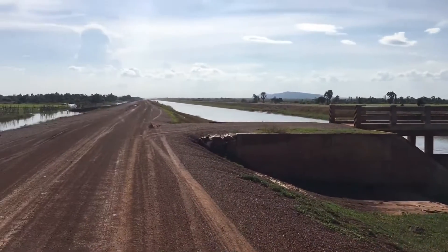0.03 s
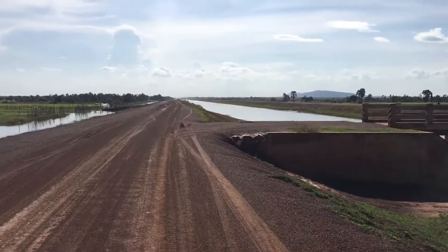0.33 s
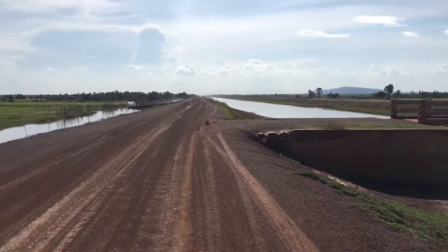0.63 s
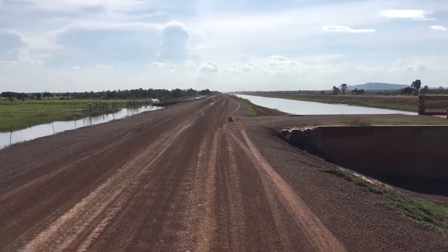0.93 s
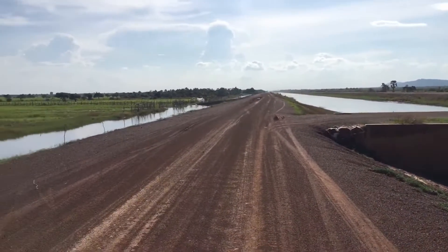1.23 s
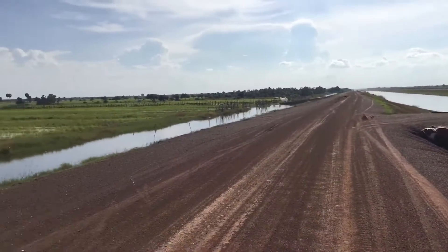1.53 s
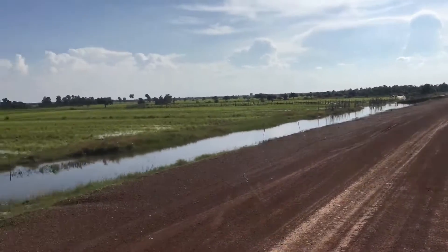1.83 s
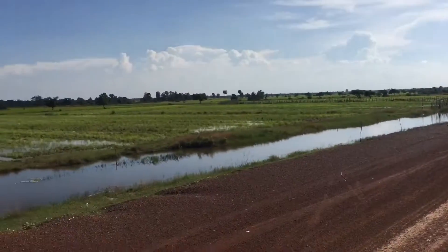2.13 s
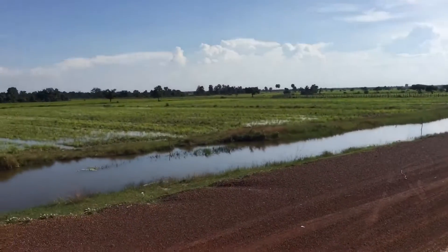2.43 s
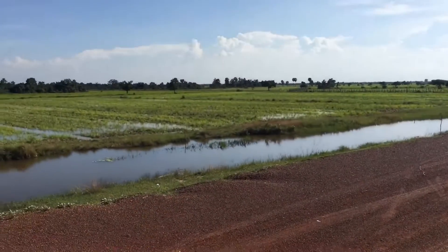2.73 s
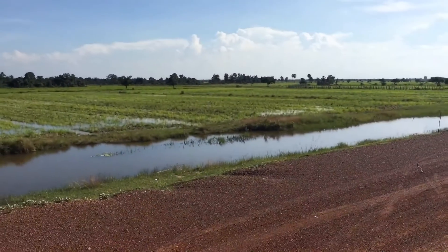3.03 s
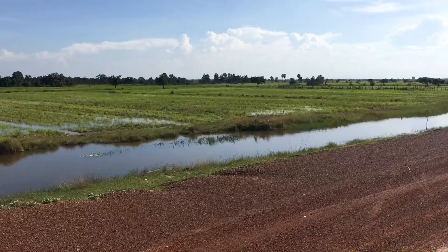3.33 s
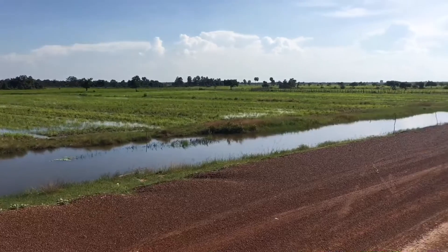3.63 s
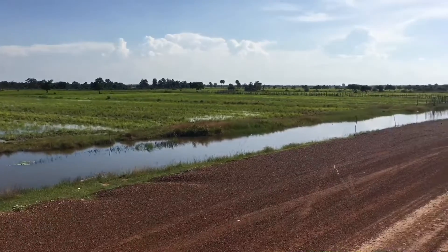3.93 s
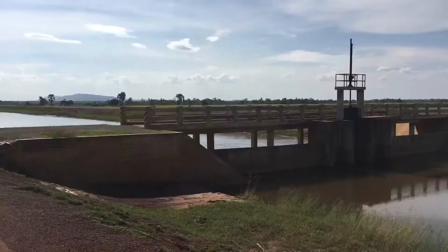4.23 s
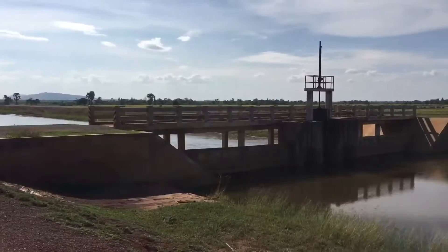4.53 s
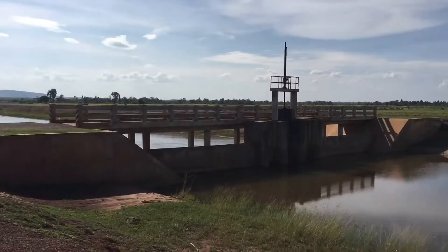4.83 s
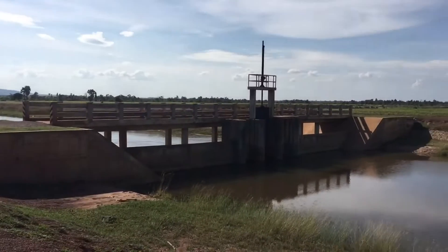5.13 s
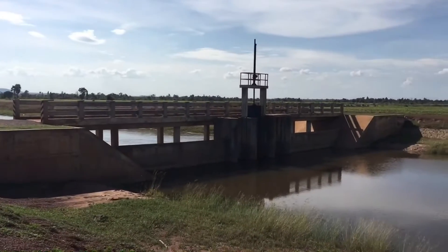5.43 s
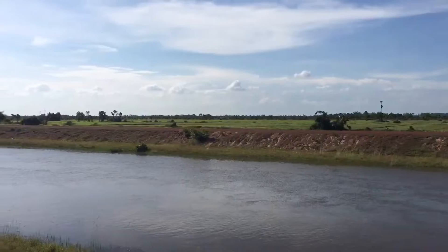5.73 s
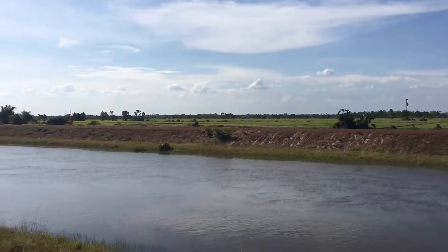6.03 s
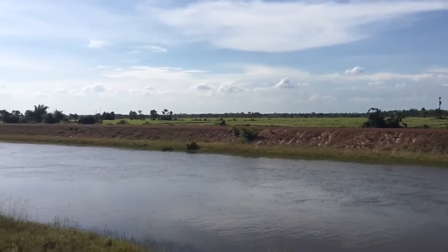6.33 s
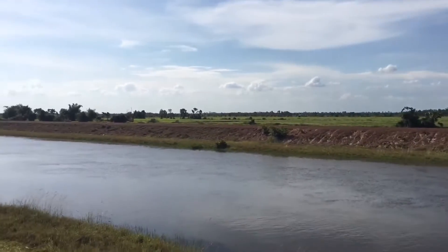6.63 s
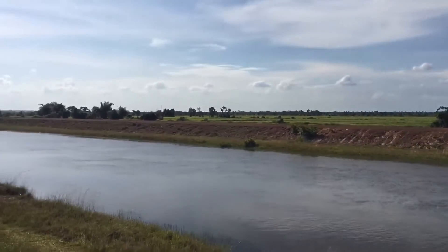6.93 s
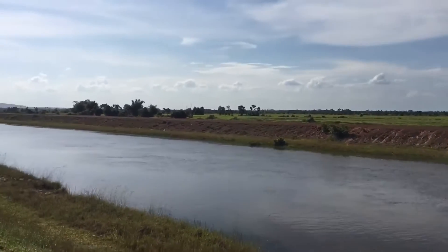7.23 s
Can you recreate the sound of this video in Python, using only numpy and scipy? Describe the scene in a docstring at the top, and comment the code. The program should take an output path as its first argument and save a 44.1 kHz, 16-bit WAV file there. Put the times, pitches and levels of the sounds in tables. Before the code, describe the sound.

Wind rumbles on the microphone in open fields, with a frog's short buzzing calls, faint gravel crunching and a soft wash of water.

```python
"""Rice fields beside a canal

Three spots joined by fades, with wind buffeting the microphone throughout. In the fields a frog pulses
its vocal sac in a run of short buzzing notes and gravel shifts underfoot; at a sluice, water hisses;
on the open bank a bush cricket chirps with its wings over a far frog. A small bird adds thin whistles."""
import sys
import numpy as np
from scipy import signal
from scipy.fft import rfft, irfft
from scipy.io import wavfile
from scipy.ndimage import uniform_filter1d

SR = 44100
rng = np.random.default_rng(int(sys.argv[2]) if len(sys.argv) > 2 else 0)


def unload_wav(signal):
    """Save mono or channel-first audio to the path in sys.argv[1] as 16-bit WAV at rate SR, clipped to [-1, 1]."""
    wavfile.write(
        sys.argv[1],
        SR,
        np.round(np.clip(np.atleast_2d(signal).T, -1, 1) * 32767).astype(np.int16),
    )


N = 325017
TIME = np.arange(N) / SR
FREQS = np.fft.rfftfreq(N, 1 / SR)
TOP_HZ = 15730
# fields, sluice and bank in turn: (start [s], end [s], fade-in [s], fade-out [s])
SPOTS = [(-1, 4.226, .115, .12), (4.273, 5.553, .115, .11), (5.619, 7.371, .115, .006)]


def frog(rasp_db=-9.5, least_rasp=.1):
    """The near frog's run of buzzes; each pulse lets a puff of air through, more so in a fluttering note."""
    # (start [s], length [s], pulse rate [Hz], level [dB], flutter [0-1], flutter rate [Hz],
    #  sac resonance [Hz], its width [Hz], onset bend [share of pulse rate], slide [share of pulse rate])
    notes = [(1.912, .009, 490, -60, .4, 110, 2800, 550, .1, 0),
             (2.123, .026, 498, -56, 0.4, 105, 3000, 450, 0.14, 0.03),
             (2.306, .033, 491, -54.5, 0.04, 110, 2960, 420, 0.23, 0.014),
             (2.493, 0.035, 492, -52.5, 0, 110, 3040, 380, 0.11, .015),
             (2.536, 0.023, 498, -58.5, .2, 110, 2960, 350, 0.033, 0.065),
             (2.678, 0.045, 495, -53.5, 0, 110, 3150, 320, 0.19, 0.017),
             (2.71, 0.027, 507, -56, 0.2, 110, 3060, 140, .08, -.015),
             (2.862, 0.04, 502, -49.5, 0.5, 109, 3150, 208, 0.11, -0.0093),
             (3.023, 0.02, 520, -51, 0.3, 111, 3190, 190, .03, .02),
             (3.041, 0.008, 556, -49, 0.3, 110, 3200, 260, .04, -.08),
             (3.048, 0.036, 502, -53.5, 0.15, 110, 3250, 320, .04, .016),
             (3.168, 0.038, 520, -50.5, 0, 109, 3160, 170, .06, -0.013),
             (3.263, 0.045, 496, -54, 0.2, 108, 3150, 343, 0.11, 0.018),
             (3.306, 0.035, 517, -52, 0, 111, 3180, 190, 0.04, -0.013),
             (3.441, 0.022, 511, -52.5, 0.37, 150, 3180, 260, .04, 0.035),
             (3.459, 0.034, 500, -53.5, 0.3, 120, 3200, 380, 0.089, -0.0054),
             (3.602, 0.039, 516, -60, .3, 108, 2920, 350, 0.063, .014),
             (3.701, 0.043, 493, -51.5, 0, 112, 3140, 382, .1, 0.013),
             (3.7517, 0.039, 509, -53.5, 0, 110, 2980, 210, 0.043, -0.014),
             (3.889, .011, 510, -50, 0.3, 170, 3000, 320, .05, -0.049),
             (3.901, .017, 485, -45.5, 0.04, 110, 3080, 240, 0.052, 0.037),
             (3.923, 0.01, 503, -51, 0.3, 262, 3000, 350, .02, .05),
             (4.052, 0.04, 505, -48, 0.06, 112, 3070, 240, 0.12, 0.026)]
    out = np.zeros(N)
    for start, length, rate_hz, db, flutter, flutter_hz, sac_hz, width_hz, onset_bend, slide in notes:
        voice = buzz(length, rate_hz, sac_hz, width_hz, flutter, flutter_hz, onset_bend, slide)
        voice = band(voice, 1350, 4100, order=3)
        breath = abs(voice) * rng.standard_normal(SR // 5)[:len(voice)]
        rasp = amp(rasp_db) * np.sqrt(flutter + least_rasp) * unit(band(breath, 2500, 4000, order=4))
        add(out, start, at_level(unit(voice) + rasp, length, db))
    return out


def buzz(length, rate_hz, sac_hz, width_hz, flutter, flutter_hz, onset_bend, slide, end_bend=.084, sag=.14):
    """A pulse train rings the vocal sac; its rate settles, slides, and rises as the note gives out."""
    # the frog's body resonances beside the sac: (pitch [Hz], width [Hz], gain [dB])
    body_modes = [(1610, 240, -19.5), (1870, 320, -24), (2380, 200, -44), (3470, 1300, -47),
                  (5240, 1000, -12)]
    t = np.arange(round((length + .01) * SR)) / SR
    jitter = (.005 + .035 * flutter) * wobble(len(t), 70)
    settle = onset_bend * np.exp(-t / .00432)
    rise = end_bend * np.exp(np.minimum(t - length, 0) / .0048)
    bend = settle + slide * (t / length - .5) + rise
    cycles = np.cumsum(rate_hz * (1 + bend + jitter)) / SR
    pulses = np.cos(2 * np.pi * np.outer(cycles - .2, np.arange(1, 15))).sum(1)
    pulses *= 1 + (.05 + .25 * flutter) * rng.standard_normal(len(t))  # fluttering notes are hoarse
    effort = np.clip(3 * (1.04 - t / length), 0, 1)  # full at once, tapering over the last third
    # flutter breaks the note into bursts that start hard and die away
    bursts = 1 - flutter * np.clip(3 * (flutter_hz * t % 1) - 1, 0, 1)
    drive = pulses * effort * (1 - sag * t / length) * bursts
    body = sum(amp(db) * ring(drive, hz, width) for hz, width, db in body_modes)
    return ring(drive, sac_hz, width_hz) + body


def wind(rumble_db=1, flutter_db=-29.5, eddy_hz=22, breeze_db=-55):
    """Gusts rise out of a light breeze and rumble on the microphone; eddies churn a brighter flutter."""
    # one curve a spot: (time [s], strength [dB])
    gusts = [
        [(0.0, -44.5), (0.13, -45.5), (0.15, -37), (0.34, -28.5), (0.38, -19.5), (0.43, -50), (0.49, -35.5),
         (0.54, -48), (0.62, -36.5), (0.76, -41.5), (0.79, -28), (0.89, -36), (0.91, -29), (0.99, -37.5),
         (1.29, -42.5), (1.37, -32), (1.46, -43), (1.51, -37), (1.64, -34), (1.66, -44.5), (1.72, -32.5),
         (1.8, -47), (2.12, -42.5), (2.14, -58), (2.17, -42.5), (2.5, -47.5), (2.52, -39.5), (2.61, -49.5),
         (2.65, -41.5), (2.76, -55.5), (2.79, -46.5), (3.07, -66.5), (3.09, -44), (3.12, -55.5), (3.4, -58),
         (3.54, -41), (3.59, -62), (3.65, -39), (3.75, -66), (3.77, -50), (3.92, -46.5), (4.02, -53),
         (4.1, -48.5), (4.14, -64)],
        [(4.31, -32.5), (4.34, -37.5), (4.418, -23.5), (4.445, -31.5), (4.485, -29), (4.515, -23), (4.582, -27),
         (4.618, -37), (4.668, -22), (4.69, -28), (4.712, -26.5), (4.812, -36), (4.867, -26), (4.9, -37),
         (4.93, -32), (4.966, -36), (4.996, -34), (5.052, -42), (5.1, -26), (5.128, -32), (5.15, -27.5),
         (5.175, -35), (5.197, -22.5), (5.222, -32.5), (5.275, -28), (5.33, -28), (5.354, -19.5), (5.392, -25),
         (5.433, -22), (5.47, -27), (5.55, -30.5)],
        [(5.7, -40.5), (5.708, -47), (5.812, -32), (5.838, -36), (5.865, -33.5), (5.895, -38), (5.932, -29.5),
         (6.01, -34), (6.06, -37), (6.1, -31.5), (6.202, -45), (6.22, -35), (6.3, -36.5), (6.332, -27),
         (6.396, -54.5), (6.49, -39), (6.53, -32), (6.588, -45.5), (6.615, -28), (6.655, -33.5), (6.68, -30.5),
         (6.714, -40), (6.858, -33), (6.904, -41.5), (6.95, -42), (6.975, -40), (7.0, -40), (7.055, -31),
         (7.086, -52.5), (7.118, -37), (7.146, -48), (7.286, -29), (7.342, -45), (7.37, -25.5)],
    ]
    # the low rumble's colour: (frequency [Hz], relative level [dB])
    rumble_colour = [(12, -51.5), (20, -13), (52, 7.5), (81, 5), (160, -8), (241, -20), (349, -41.5),
                     (600, -51.5), (780, -65), (1320, -120)]
    # at the sluice the wind strikes from another side and drums higher: (frequency [Hz], relative level [dB])
    sluice_colour = [(12, -53), (20, -14), (50, 6.5), (80, 7), (120, 3), (165, -7), (241, -24.5),
                     (349, -43.5), (600, -50), (780, -69), (1320, -120)]
    # the flutter's colour: (frequency [Hz], relative level [dB])
    flutter_colour = [(100, -20), (200, 8), (260, 3), (330, -5), (480, -20.5), (700, -27), (1000, -53),
                      (2000, -54), (5000, -77)]
    gust_db = np.interp(TIME, *np.vstack(gusts).T)
    eddies = drift(eddy_hz)
    at_sluice = during(*SPOTS[1][:2])
    rumble = np.where(at_sluice, noise(sluice_colour, 25, 220), noise(rumble_colour, 25, 220))
    rumble *= unit(amp(3 * eddies))
    # evened out over 45 ms: slower swells belong to the gust, not to the eddies
    rumble /= np.sqrt(uniform_filter1d(rumble ** 2, size=2000) + 1e-9)
    flutter = noise(flutter_colour, 250, 600) * amp(gust_db + flutter_db + 5 * eddies)
    breeze = amp(breeze_db) * unit(band(rng.standard_normal(N), 75, 165))
    return rumble * amp(gust_db + rumble_db) + flutter + breeze


def wind_puffs(octaves=1.37):
    """Single eddies give the microphone a brief low slap; smaller, faster ones reach higher."""
    # (middle [s], length [s], level [dB], top of band [Hz])
    slaps = [(0.307, 0.046, -48, 241), (0.377, 0.019, -25, 127), (0.453, 0.017, -34.5, 250),
             (0.905, 0.031, -44, 195), (1.36, 0.035, -34.5, 187), (4.372, 0.033, -44, 317),
             (4.515, 0.025, -34, 250), (4.567, 0.031, -39.5, 290), (4.69, 0.032, -47, 183),
             (5.199, .022, -47, 323), (5.287, 0.057, -25, 220), (5.354, 0.024, -34.5, 345),
             (5.361, .1, -53, 640), (5.406, 0.083, -37.5, 285), (5.912, .028, -50, 645),
             (6.228, 0.022, -53.5, 323), (6.312, 0.023, -39, 254), (7.268, 0.053, -41, 225)]
    out = np.zeros(N)
    for middle, length, db, top_hz in slaps:
        swirl = band(rng.standard_normal(SR // 2), top_hz / 2 ** octaves, top_hz, order=3)
        swirl = swirl[-round(2 * length * SR):]
        add(out, middle - length, at_level(swirl * np.hanning(len(swirl)), length, db))
    return out


def cricket(start=5.63, interval=.0876, length=.0655, wing_hz=9570, strokes_hz=125, full_db=-60.5):
    """Each chirp is a row of wing strokes that grow louder; the tone slides and wavers in every stroke."""
    out, t = np.zeros(N), np.arange(round(length * SR)) / SR
    for elapsed in np.arange(12) * interval:
        db = full_db - 10 * np.exp(-elapsed / .17)  # the first chirps swell to full strength
        stroke = (length - t) * strokes_hz * rng.uniform(.87, 1.2) % 1  # runs from 1 to 0 in each stroke
        hz = wing_hz * (1 + .012 * (stroke - .5) + .0086 * wobble(len(t), 150))
        swell = np.minimum(.031 + t / length, 1)
        add(out, start + elapsed, amp(db) * swell * np.sin(np.pi * stroke) ** 2 * sine(hz))
    return out


def chips(width_hz=720):
    """Lone sharp chips: a few rough pulses ring a resonance that drops quickly."""
    # (start [s], length [s], pulse rate [Hz], level [dB], resonance [Hz], its fall [Hz/s])
    events = [(1.553, 0.0055, 1090, -37.5, 3650, 121000), (1.5577, 0.0014, 810, -44, 3270, 50000),
              (4.392, 0.0061, 760, -47, 3770, 198000)]
    out, t = np.zeros(N), np.arange(SR // 50) / SR
    pole = np.exp(-np.pi * width_hz / SR)
    for start, length, rate_hz, db, hz, fall in events:
        pulses = unit(np.diff(np.floor(rate_hz * t), prepend=-1))
        drive = (pulses + rng.standard_normal(len(t))) * (t < length)
        sweep = np.exp(2j * np.pi * np.cumsum(hz - fall * np.minimum(t, length)) / SR)
        chip = (sweep * signal.lfilter([1], [1, -pole], drive / sweep)).imag  # the ring rides the sweep
        add(out, start, at_level(band(chip, 1150, 5800, order=3), length, db))
    return out


def gravel_ticks(crunch=.43, crunch_s=.0018, rattle=.34):
    """Gravel and small knocks: each is a rattling, dying ring under a tiny burst of crunch."""
    # (time [s], level [dB], ring [Hz], time to fall 60 dB [s])
    ticks = [(0.177, -51, 1355, 0.05), (.235, -54.5, 3750, 0.03), (.277, -49.5, 2790, 0.023),
             (.292, -49, 1320, 0.081), (.729, -52.5, 3040, 0.044), (1.02, -42.5, 1720, 0.012),
             (1.364, -50, 993, .2), (1.556, -61.5, 2400, 0.37), (1.655, -55, 2900, .04),
             (2.191, -49, 1600, 0.0089), (2.392, -46.5, 1750, 0.0088), (3.401, -49.5, 1460, 0.034),
             (4.114, -33, 1150, 0.0038), (4.394, -46, 1905, 0.05), (4.504, -50, 2470, 0.16),
             (4.611, -46.5, 1160, 0.032), (4.638, -51, 3700, .01), (4.65, -54.5, 3900, 0.02),
             (4.664, -53, 3670, .012), (4.83, -54, 1080, 0.14), (5.285, -50, 1086, 0.15),
             (5.458, -45.5, 1080, 0.032)]
    out, t = np.zeros(N), np.arange(SR // 5) / SR
    for start, db, hz, t60 in ticks:
        burst = unit(band(rng.standard_normal(len(t)), .62 * hz, 1.56 * hz, order=3))
        burst *= np.exp(-t / crunch_s)
        chatter = unit(band(rng.standard_normal(len(t)), .88 * hz, 1.02 * hz))
        tone = np.sin(2 * np.pi * hz * t) + rattle * chatter
        add(out, start, amp(db) * (tone * amp(-60 * t / t60) + crunch * burst))
    return out


def scuffs(grains_per_s=2500):
    """A sole scuffs the gravel: a dry spray of sand grains that dies away."""
    # (time [s], level [dB], bottom of band [Hz], top of band [Hz], decay [s])
    sprays = [(.345, -68, 3300, 6000, .015), (0.413, -57, 2200, 5000, 0.0055),
              (0.616, -51.5, 4000, 5900, 0.0033), (.836, -60, 2400, 5360, 0.012),
              (0.931, -64.5, 2300, 7000, 0.025), (1.02, -46, 1250, 2120, 0.0026),
              (1.056, -63, 3500, 5700, .006), (1.552, -50, 1200, 2500, 0.0046),
              (1.717, -60, 2300, 4920, 0.0041), (4.485, -64, 3500, 9500, .02),
              (4.505, -63, 4020, 14000, 0.014), (4.505, -51.5, 1610, 3420, 0.0056)]
    out, t = np.zeros(N), np.arange(SR // 10) / SR
    for start, db, lo_hz, hi_hz, decay_s in sprays:
        grains = rng.standard_normal(len(t)) * (rng.random(len(t)) < grains_per_s / SR)
        add(out, start, amp(db) * unit(band(grains, lo_hz, hi_hz, order=3)) * np.exp(-t / decay_s))
    return out


def grit(spread_db=7, tilt=.11, clump_db=6, clump_hz=18):
    """Small stones shift underfoot in clumps, each with a brief ring; larger ones are lower and louder."""
    # shifting feet: (start [s], end [s], base rate [stones/s], base level [dB])
    shuffles = [(0.015, 1.196, 430, -61), (1.206, 1.794, 400, -67), (1.795, 4.2, 95, -68),
                (4.375, 4.702, 290, -60.5), (4.697, 6.998, 420, -70)]
    out = np.zeros(N)
    clumps = unit(amp(clump_db * drift(clump_hz)))
    stones_per_s = clumps * sum(rate * during(start, end) for start, end, rate, _ in shuffles)
    force = sum(amp(db) * during(start, end) for start, end, _, db in shuffles)
    stones_hz = np.geomspace(1300, 7200, 32)
    for hz in stones_hz:
        hits = rng.random(N) < stones_per_s / len(stones_hz) / SR
        strength = force * amp(spread_db * rng.uniform(-2.2, 1, N))
        out += ring(hits * strength, hz, .065 * hz) * (2000 / hz) ** tilt
    return out


def pinpricks(lo_hz=8000, decay_s=.0011):
    """Tiny, very high clicks at the microphone."""
    # (time [s], peak [dB])
    clicks = [(0.2962, -52), (0.7592, -57), (2.3044, -53), (2.766, -53), (3.3084, -54), (3.7698, -57),
              (4.4514, -53), (4.4595, -57), (4.9666, -54), (6.0806, -55), (6.3894, -58), (7.085, -51)]
    out, t = np.zeros(N), np.arange(400) / SR
    for start, peak_db in clicks:
        click = band(rng.standard_normal(len(t)) * np.exp(-t / decay_s), lo_hz, TOP_HZ)
        add(out, start, amp(peak_db) * click / abs(click).max())
    return out


def bird(arch=.053):
    """A small bird's thin whistles, arching in pitch as they swell and fade."""
    # (start [s], length [s], top pitch [Hz], peak [dB])
    whistles = [(.53, .05, 8350, -72), (1.295, 0.015, 7550, -64), (1.517, 0.024, 7350, -70),
                (6.239, 0.0041, 7300, -58), (6.248, 0.0066, 7300, -58.5), (6.474, 0.0087, 7350, -67)]
    out = np.zeros(N)
    for start, length, hz, db in whistles:
        swell = np.sin(np.linspace(0, np.pi, round(length * SR)))
        add(out, start, amp(db) * swell * sine(hz * (1 - arch * (1 - swell))))
    return out


def far_frogs(uneven_db=4, rate_hz=495):
    """Evenly paced buzzes; distance leaves only the band around the vocal sac."""
    # (first call [s], silent from [s], interval [s], call length [s], sac resonance [Hz], mean level [dB])
    callers = [(0.154, .95, .174, 0.056, 3000, -66.5), (5.803, 7.33, .133, 0.018, 1460, -72)]
    out = np.zeros(N)
    for first, until, interval, length, hz, db in callers:
        for start in np.arange(first, until, interval):
            call = buzz(length, rate_hz, hz, .19 * hz, flutter=.79, flutter_hz=110, onset_bend=.089, slide=0)
            distant = ring(call, hz, .59 * hz) * signal.windows.tukey(len(call), .4)
            add(out, start, at_level(distant, length, db + uneven_db * rng.standard_normal()))
    return out


def air(waver_db=.64, waver_hz=28, split_hz=3000, hiss_share=.13):
    """Breeze in the grass and moving water: a wavering body under a smoother high hiss."""
    # the wash's colour at each spot: (frequency [Hz], relative level [dB])
    fields = [(150, -18), (260, -0.5), (571, -5.5), (689, -7.5), (804, -11), (906, -7.5), (1460, -10.5),
              (1650, -12), (1920, -17), (2900, -18.5), (3750, -25.5), (4370, -25.5), (4930, -26.5),
              (5750, -28.5), (15500, -35)]
    sluice = [(240, -40), (400, -6), (438, -3.5), (643, -4), (694, -5), (749, -7), (1020, -1.5),
              (1490, -8.5), (2320, -12.5), (2920, -16), (3620, -11), (4920, -17.5), (5310, -17.5),
              (9350, -20), (15500, -27.5)]
    bank = [(240, -4), (400, 2), (569, -7.5), (614, -2), (694, -8), (796, -8), (1450, -9.5), (1610, -13),
            (1910, -11), (2630, -17), (3210, -13), (7790, -17), (9650, -18), (10400, -20), (15500, -23)]
    # base levels: (fields [dB], sluice [dB], bank [dB])
    levels = [-61.5, -68, -75]
    # softer as the microphone turns to the paddies, lifted from the sluice on: (time [s], gain [dB])
    ride = [(1.2, -2.5), (1.6, 0), (2.4, -0.5), (2.9, -3.5), (4.2, -2.5), (4.3, 7.5)]
    ride_db = np.interp(TIME, *np.transpose(ride))
    wash = np.zeros(N)
    for (start, end, _, _), colour, db in zip(SPOTS, (fields, sluice, bank), levels):
        wash += amp(db) * noise(colour, 800, 2400) * during(start, end)
    body = low_pass(wash, split_hz)
    hiss = wash - body
    blend = body * amp(ride_db) + hiss * amp(hiss_share * ride_db)
    return rustle(blend * amp(waver_db * drift(waver_hz)))


def rustle(x):
    """Rustles come and go in patches about 25 ms long and 500 Hz wide, strongest in the mids."""
    hz, _, spectra = signal.stft(x, SR, nperseg=512)
    patches = uniform_filter1d(rng.standard_normal(spectra.shape), size=6, axis=0)
    patches = unit(uniform_filter1d(patches, size=4, axis=1))
    depth_db = np.interp(hz, [300, 1200, 4000, 9000], [1, 2.3, 1.8, .3])[:, None]
    return signal.istft(spectra * amp(depth_db * patches), SR, nperseg=512)[1][:N]


def field_echo(x, wet_db=-21, t60=.98, build_s=.0098):
    """Adds a faint scatter back from the banks and the grass."""
    t = np.arange(SR // 2) / SR
    tail = rng.standard_normal(len(t)) * amp(-60 * t / t60) * np.minimum(t / build_s, 1)
    return x + amp(wet_db) * signal.fftconvolve(x, tail / np.linalg.norm(tail))[:N]


def amp(db):
    """Decibels to gain."""
    return 10 ** (np.asarray(db) / 20)


def unit(x):
    """Scales to rms 1."""
    return x / np.sqrt(np.mean(x ** 2) + 1e-20)


def at_level(x, length, db):
    """Sets the rms of a note over its length in seconds."""
    return amp(db) * x / np.sqrt(np.sum(x ** 2) / (length * SR))


def add(mix, start, sound):
    """Adds a sound into the mix at start seconds."""
    part = mix[round(start * SR):][:len(sound)]
    part += sound[:len(part)]


def during(start, end):
    """A gate, open between two times."""
    return (TIME > start) & (TIME < end)


def sine(hz):
    """A tone that follows a pitch curve."""
    return np.sin(2 * np.pi * np.cumsum(hz) / SR)


def band(x, lo_hz, hi_hz, order=2):
    """Causal band-pass."""
    return signal.sosfilt(signal.butter(order, [lo_hz, hi_hz], "band", fs=SR, output="sos"), x)


def low_pass(x, hz):
    """Zero-phase treble roll-off."""
    return irfft(rfft(x) / (1 + (FREQS / hz) ** 4), N)


def ring(x, hz, width_hz):
    """One resonance: every pulse leaves a dying sine."""
    pole = np.exp((2j * np.pi * hz - np.pi * width_hz) / SR)
    return signal.lfilter([1], [1, -pole], x).imag


def noise(colour, lo_hz, hi_hz):
    """Noise of the given colour, at rms 1 between lo_hz and hi_hz."""
    hz, db = np.transpose(colour)
    spectrum = rfft(rng.standard_normal(N)) * amp(np.interp(np.log(FREQS + 1), np.log(hz + 1), db))
    return irfft(spectrum, N) / np.std(irfft(spectrum * (FREQS > lo_hz) * (FREQS < hi_hz), N))


def drift(rate_hz):
    """Slow random wander of rms 1."""
    return unit(low_pass(rng.standard_normal(N), rate_hz))


def wobble(samples, smooth_samples):
    """Quick random wander for one note, of rms about 1."""
    return unit(uniform_filter1d(rng.standard_normal(N // 50), size=smooth_samples))[:samples]


def scene():
    """Near sounds with their echo, then far frogs, clicks, wind and open air, in mono."""
    near = frog() + chips() + gravel_ticks() + scuffs() + grit() + bird() + cricket()
    return (field_echo(near) + far_frogs() + pinpricks() + wind() + wind_puffs() + air())[None]


def record(dry, bass_cut_hz=36):
    """The microphone's bass cut and port notches, the fades between spots, and the band limit."""
    # dips from the microphone's port: (centre [Hz], width [Hz], gain [dB])
    notches = [(4910, 440, -3.5), (10450, 680, -4.5)]
    hz = np.fft.rfftfreq(2 * N, 1 / SR)
    port_db = sum(db * np.exp(-(2 * (hz - centre) / width) ** 2) for centre, width, db in notches)
    bass_cut = hz ** 2 / np.hypot(hz ** 2, bass_cut_hz ** 2)
    heard = irfft(rfft(dry, 2 * N) * amp(port_db) * bass_cut)[:, :N]
    fades = np.zeros(N)
    for start, end, rise, fall in SPOTS:
        corners = [start, start + .001, start + rise, end - fall, end - .002, end]
        fades += np.interp(TIME, corners, [0, .18, 1, 1, .14, 0])
    band_limit = signal.firwin(1023, TOP_HZ, window=("kaiser", 9), fs=SR)
    return signal.oaconvolve(heard * fades, band_limit[None], "same")


dry = scene()
out = record(dry)
unload_wav(out)
```